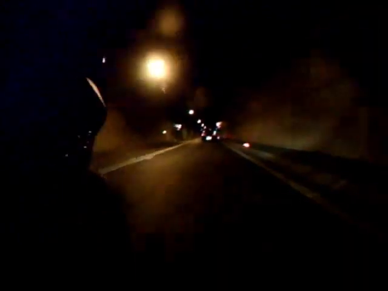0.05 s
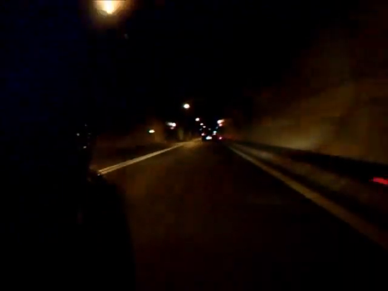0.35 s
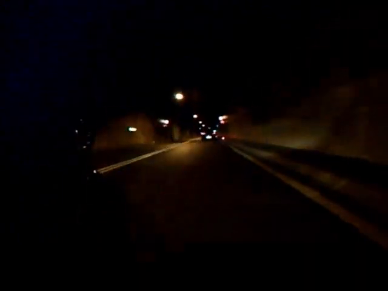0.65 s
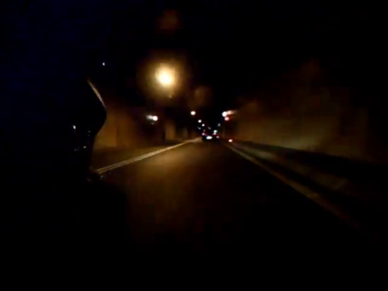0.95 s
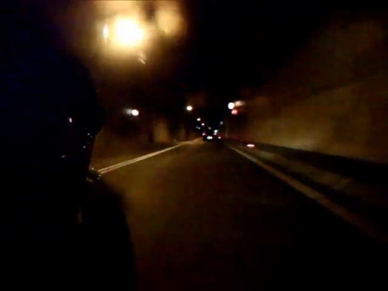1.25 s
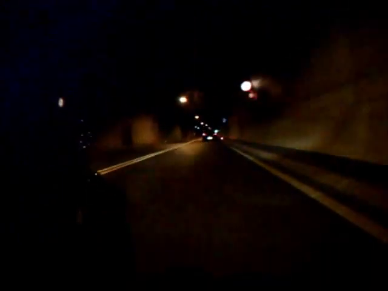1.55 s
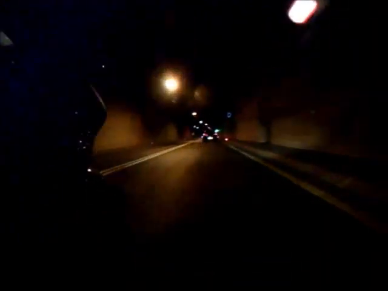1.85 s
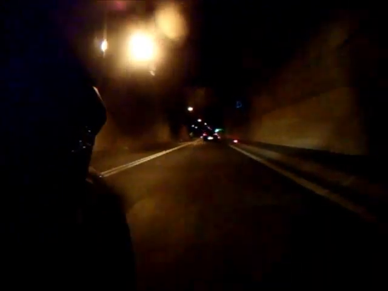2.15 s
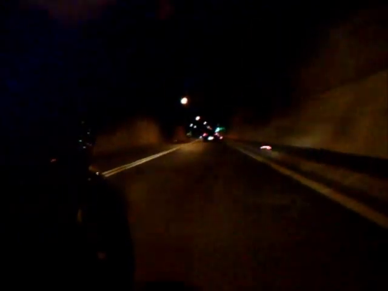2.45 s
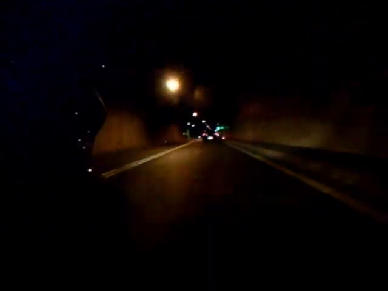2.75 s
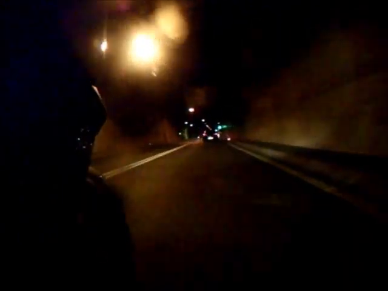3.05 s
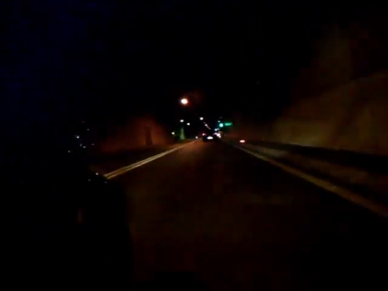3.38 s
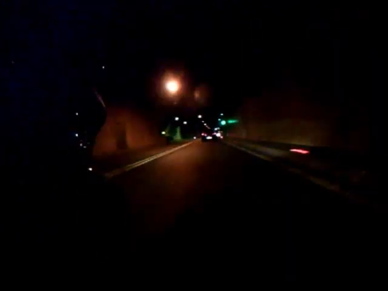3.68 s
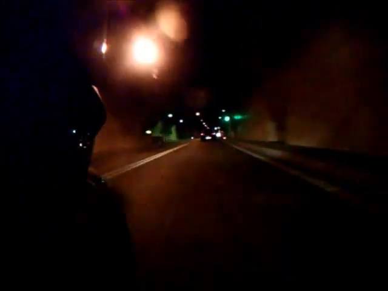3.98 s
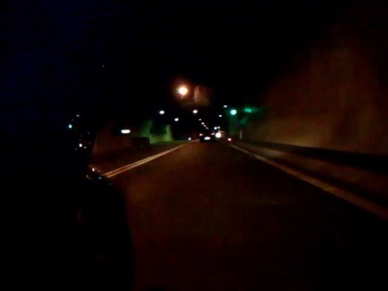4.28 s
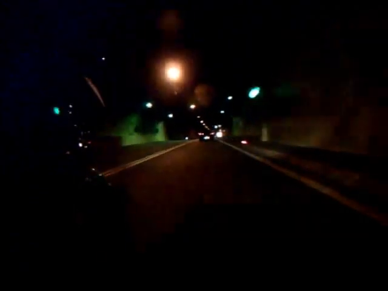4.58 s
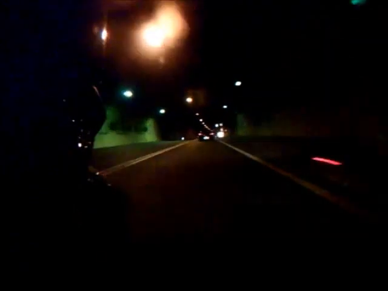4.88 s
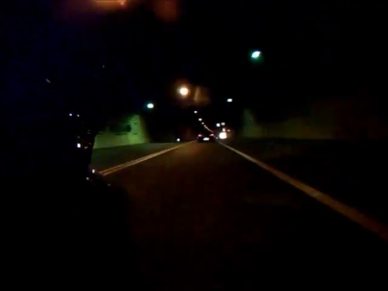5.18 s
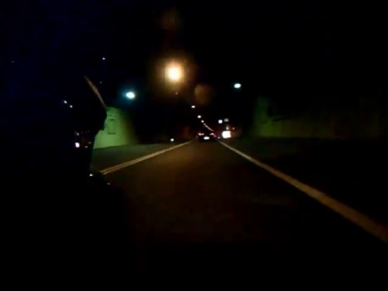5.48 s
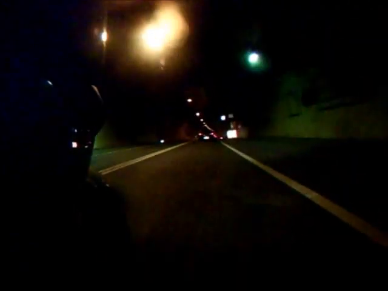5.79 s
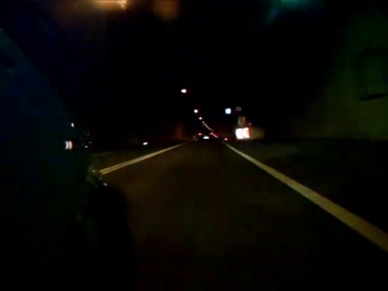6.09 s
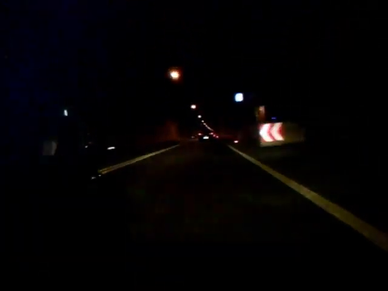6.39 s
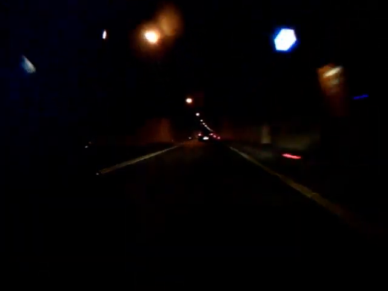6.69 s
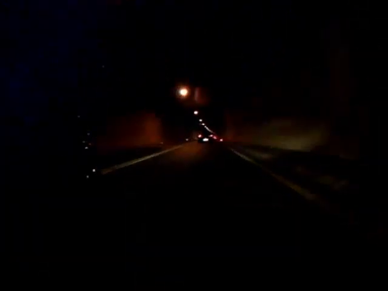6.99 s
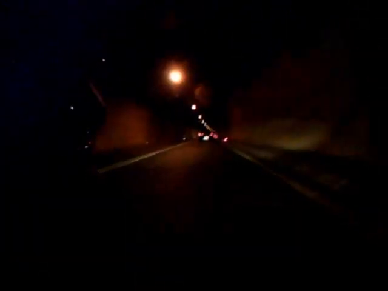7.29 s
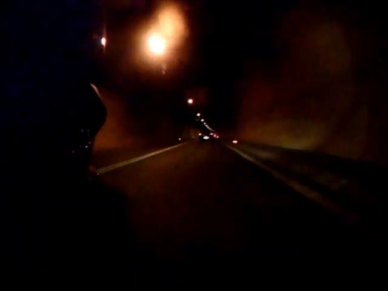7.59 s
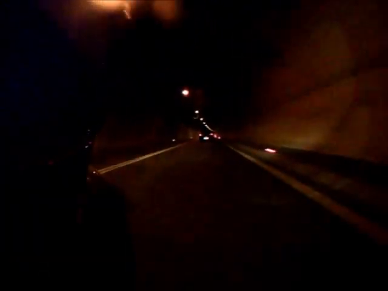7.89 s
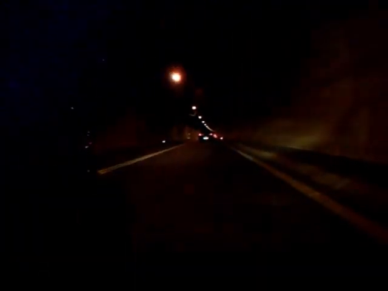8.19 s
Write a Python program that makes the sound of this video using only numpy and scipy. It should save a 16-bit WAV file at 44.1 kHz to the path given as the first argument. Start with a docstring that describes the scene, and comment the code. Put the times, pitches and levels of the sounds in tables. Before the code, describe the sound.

Wind and tyre roar surround the even hum and whine of a motorcycle cruising in a tunnel, with occasional bumps and faint ticks.

```python
"""In a road tunnel, a four-cylinder motorcycle cruises along with a small camera mounted on it.
Wind and tyres roar, bumps set the mount swinging, and another engine rises faintly far off.
Over the roar the exhaust hums, the gears whine and the valves clatter, echoing off the concrete.
The camera passes only a narrow band of pitches and ticks where its blocks of sound join."""
import sys
import numpy as np
from scipy import signal
from scipy.fft import rfft, irfft, next_fast_len
from scipy.io import wavfile
from scipy.ndimage import uniform_filter1d, map_coordinates

SR = 44100
rng = np.random.default_rng(int(sys.argv[2]) if len(sys.argv) > 2 else 0)


def master(y):
    """Save y as 16-bit WAV."""
    cut = np.clip(np.atleast_2d(y).T, -1, 1)
    pcm = np.round(cut * 32767)  # scale
    wavfile.write(sys.argv[1], SR, pcm.astype(np.int16))


N = 367794
T = np.arange(N) / SR


def amp(db):
    """Turn decibels into a gain."""
    return 10 ** (np.asarray(db) / 20)


def unit(x):
    """Scale x to an average (rms) level of 1."""
    return x / np.sqrt(np.mean(x ** 2) + 1e-20)


def along(points, hz):
    """Read between (f/Hz, value) points on a log pitch scale."""
    f, values = np.transpose(points)
    return np.interp(np.log(hz + 1), np.log(f + 1), values)


def curve(points):
    """Join (t/s, value) points with straight lines."""
    return np.interp(T, *np.transpose(points))


def wobble(rate):
    """A smooth random curve through `rate` points a second."""
    coarse = T[::64]
    return np.interp(T, coarse, map_coordinates(rng.standard_normal(400), [coarse * rate], mode="wrap"))


def filtered(x, response):
    """Shape x with a response given for each frequency."""
    size = next_fast_len(N + SR // 2)
    return irfft(rfft(x, size) * response(np.fft.rfftfreq(size, 1 / SR)), size)[:N]


def noise(response):
    """Noise of rms 1, shaped by a response."""
    return unit(filtered(rng.standard_normal(N), response))


def resonance(hz, centre, width):
    """The response of something that rings at one pitch."""
    return 1j * hz * width / (centre ** 2 - hz ** 2 + 1j * hz * width)


def pulses(turns):
    """One pulse, shared between two samples, each time turns passes a whole number."""
    at = np.interp(np.arange(np.ceil(turns[0]), turns[-1]), turns, np.arange(N))
    whole = at.astype(int)
    return (np.bincount(whole, 1 - at + whole, N + 1) + np.bincount(whole + 1, at - whole, N + 1))[:N]


def tone(turns, scatter, rate):
    """A sine plus its drifting reflections from the passing walls, at rms 1."""
    angle = 2 * np.pi * (turns + rng.random())
    return unit((1 + scatter * wobble(rate)) * np.sin(angle) + scatter * wobble(rate) * np.cos(angle))


# The distant engine speeding up: start t/s, end t/s, first f/Hz, last f/Hz, level/dB
FAR_RISE = (4.5, 6, 104, 131, -55.5)

def far_engine():
    """The second and third harmonics of another engine swell, rise and fade far down the tunnel."""
    start, end, first_hz, last_hz, db = FAR_RISE
    progress = np.clip((T - start) / (end - start), 0, 1)
    turns = np.cumsum(first_hz + (last_hz - first_hz) * progress) / SR
    harmonics = sum(tone(k * turns, scatter=0.39, rate=10) for k in (2, 3))
    return amp(db) * np.sin(np.pi * progress) * harmonics


def tunnel_echo(x, fade_s=1.4):
    """The concrete tube answers with a long, blurred echo."""
    t = T[:2 * SR]
    tail = rng.standard_normal(len(t)) * amp(-60 * t / fade_s)
    return signal.fftconvolve(x, tail / np.linalg.norm(tail))[:N]


# The ticks that stand out: t/s, relative level/dB
LOUD_SNAPS = [(0.2538, -25), (0.3207, -25), (0.3875, -23), (0.4544, -27), (0.5212, -29), (0.9547, -30),
              (1.8891, -31), (2.5232, -24), (2.59, -29), (2.7237, -26), (3.024, -27), (3.5244, -31),
              (3.7918, -32), (4.0921, -31), (4.1589, -33), (4.6593, -27), (4.793, -31), (5.2934, -34),
              (5.8606, -29), (6.0611, -34), (6.3614, -27), (7.5627, -28), (7.6296, -27), (8.1973, -28)]

def camera_ticks(gain_db=6.5, first_s=.1873, tick_gap_s=.0668, run_gap_s=.5673, pattern_s=2.7703):
    """One-sample spikes where blocks of sound join, in repeating runs: most are faint, a few snap."""
    times = [first_s + pattern_s * pattern + run_gap_s * run + tick_gap_s * tick
             for pattern in range(3)
             for run, count in enumerate((6, 6, 6, 5, 5))
             for tick in range(count)]
    levels = -39.5 + 9.5 * rng.uniform(-1.3, 1, len(times))
    loud_s = np.transpose(LOUD_SNAPS)[0]
    faint = [(s, db) for s, db in zip(times, levels) if np.abs(loud_s - s).min() > tick_gap_s / 2]
    out = np.zeros(N)
    for s, db in faint + list(LOUD_SNAPS):
        out[round(s * SR)] = amp(db + gain_db) * rng.choice([-1, 1])
    return out


# How strong the road's shaking is at each pitch: f/Hz, relative level/dB
ROAD_SHAKE = [(10, -25.5), (18, -9), (24, 4), (32, 0), (45, -5), (60, -11.5), (78, -9), (98, -21),
              (130, -27.5), (200, -52.5), (400, -116)]

def road_rumble(level_db=-33.0, patchy_db=2.0):
    """Rough asphalt shakes the camera through the frame."""
    shake = noise(lambda f: amp(along(ROAD_SHAKE, f)))
    return amp(level_db + patchy_db * wobble(2.5)) * shake


# Bumps in the road: t/s, jolt level/dB, swing level/dB, swing length/s
ROAD_BUMPS = [(0.223, -14.5, -18.5, 0.55), (0.986, -23, -24.5, .25), (2.527, -15.5, -19.5, 0.26),
              (4.066, -28, -27, 0.12), (4.628, -24, -24, .17), (6.751, -33, -33, 0.7),
              (7.389, -16.5, -19, 0.27)]

def bumps(thud_hz=36.3, thud_s=.022, shudder_s=0.12, mount_hz=24.1):
    """Each bump thuds and makes the frame shudder, then the camera swings on its mount."""
    out = np.zeros(N)
    frame = amp(-17) * noise(lambda f: resonance(f, centre=67.5, width=42) ** 3)
    for s, jolt_db, swing_db, swing_s in ROAD_BUMPS:
        t = T - s
        thud = np.exp(-(t / thud_s) ** 2) * np.cos(2 * np.pi * thud_hz * t)
        shudder = frame * np.exp(-(t / shudder_s) ** 2)
        out += amp(jolt_db) * (thud + shudder)
        swing = np.clip(t / 0.063, 0, 1) * np.exp(-(t / swing_s) ** 4)
        out += amp(swing_db) * swing * np.cos(2 * np.pi * mount_hz * t)
    return out


def rattle(gain_db=-24.0, ring_hz=452, fade_s=.16):
    """The bodywork buzzes briefly after each jolt."""
    shaken = sum(amp(db) * (T > s) * np.exp(-np.abs(T - s) / fade_s) for s, db, _, _ in ROAD_BUMPS)
    return amp(gain_db) * shaken * noise(lambda f: resonance(f, ring_hz, width=70) ** 2)


# Wind and tyre noise between the walls: f/Hz, relative level/dB
ROAR_SHAPE = [(90, -15), (135, 4.5), (180, -8), (240, -7.5), (290, -12.5), (400, -3.5), (650, -5),
              (1150, -0.5), (1290, -18), (1580, -9), (2130, -15), (2550, -7), (3000, -7.5), (3500, -17.5),
              (3900, -8)]
# Pitches that the bodywork boosts or weakens: f/Hz, width/Hz, level change/dB
BODY_RINGS = [(340, 19, 3), (440, 31, 1), (785, 60, 7.5), (850, 25, -3.5), (1438, 76, 8), (1685, 45, 6.5),
              (1820, 49, 11), (1985, 97, 13), (2324, 286, 10.5), (3385, 247, 12.5)]

def roar(cycle, level_db=-32.5, throb=0.099):
    """Wind, tyres and intake rush through the bodywork, throbbing a little with the crank."""
    def colour(f):
        body_db = sum(db / (1 + (2 * (f - hz) / width) ** 2) for hz, width, db in BODY_RINGS)
        return amp(along(ROAR_SHAPE, f) + body_db)

    air = rng.standard_normal(N) * (1 + throb * np.cos(4 * np.pi * cycle))
    return amp(level_db + 0.57 * wobble(2.25)) * unit(filtered(air, colour))


# Knocks in each engine cycle: place in the cycle (0-1), f/Hz, base width/Hz, relative level/dB
CYCLE_KNOCKS = [(.75, 456, 150, -48), (.52, 347, 47, -51.5), (.8, 729, 207, -49), (.05, 1100, 240, -51.5),
                (0.2, 1806, 350, -51), (0.46, 1940, 250, -48.5), (0.43, 2394, 220, -49),
                (.93, 2435, 220, -46), (0.68, 3330, 330, -53), (0.46, 3400, 180, -52.5)]

def clatter(cycle, rasp_db=8.0, fade_cycles=0.12, uneven_db=2.5, widen=1.38):
    """Valves and pistons knock in every cycle: a sharp blow and a short rasp ring the casing."""
    out = np.zeros(N)
    for place, hz, width, db in CYCLE_KNOCKS:
        blow = unit(pulses(cycle - place)) * amp(uneven_db * wobble(35))
        since_knock = (cycle - place) % 1
        rasp = amp(rasp_db) * unit(rng.standard_normal(N) * np.exp(-since_knock / fade_cycles))
        casing = filtered(blow + rasp, lambda f: resonance(f, hz, widen * width) ** 2)
        out += amp(db) * unit(casing)
    return out


# The hum of the cylinders firing: t/s, relative level/dB
FIRING_HUM = [(0.1, -44.5), (0.28, -44.5), (1.82, -46.5), (2.12, -41.5), (6.48, -47), (6.59, -50.5),
              (7.34, -45.5), (8.25, -43)]
# The exhaust's singing note, before its swings are widened: t/s, relative level/dB
EXHAUST_NOTE = [(0.1, -47), (3.07, -54), (3.69, -51.5), (3.71, -44.5), (4.18, -49.5), (4.3, -46.5),
                (7.61, -49), (8.25, -56)]

def exhaust(cycle, singing_db=-50.0, widen=1.7):
    """Four firings a cycle make a hum, and the exhaust sings at five times that pitch."""
    firings = 4 * cycle
    hum = amp(curve(FIRING_HUM) - 0.5) * tone(firings, scatter=.05, rate=7.9)
    note_db = curve(EXHAUST_NOTE)
    swing_db = widen * (note_db - note_db.mean())
    return hum + amp(singing_db + swing_db) * tone(5 * firings, scatter=0.12, rate=8)


def throttle(speed, smooth_s=0.528, hard_pull=.3):
    """How hard the engine pulls, from -1 (slowing) to 1 (gaining speed)."""
    acceleration = uniform_filter1d(np.gradient(speed) * SR, int(smooth_s * SR))
    return np.tanh(acceleration / hard_pull)


# Crank, exhaust drone and three gear whines: multiple of the cycle rate (gets rounded), level/dB,
# change at full pull/dB, change per extra cycle a second/dB, wall scatter (0-1), flutter rate/Hz
MAIN_TONES = [(2, -39, 0, 5.5, .19, 9.7), (12, -45, -0.3, 1.5, 0.07, 14), (46, -60, -1, 14, .2, 6.6),
              (48, -50, 4, -1.5, 0.2, 8), (90.4, -61, -9, 3.5, 0.3, 10)]
# Weaker engine harmonics: multiple of the cycle rate, level/dB
WEAK_TONES = [(3, -53), (7, -60.5), (8, -60.5), (9, -56), (10, -70.5), (11, -59.5), (13, -56.5),
              (14, -59.5), (16, -60.5), (24, -54.5), (28, -63.5), (32, -58), (52, -59.5), (61, -50.5),
              (63, -54.5), (86, -64), (89, -67.5)]
# Gearbox and chain tones between the harmonics: multiple of the cycle rate, level/dB
CHAIN_TONES = [(9.25, -57.5), (11.8, -59.5), (18.51, -58.5), (19.35, -54), (30.78, -55.5)]

def engine_tones(cycle, speed, drift_db=1.0):
    """Crank, gears and chain turn with the engine; the main whine grows under load, the top one fades."""
    pull = throttle(speed)
    extra_speed = speed - speed.mean()
    out = np.zeros(N)
    for multiple, db, pull_db, speed_db, scatter, rate in MAIN_TONES:
        level_db = db + pull_db * pull + speed_db * extra_speed + drift_db * wobble(3.07)
        out += amp(level_db) * tone(np.round(multiple) * cycle, scatter, rate)
    for multiple, db in WEAK_TONES:
        out += amp(db) * tone(multiple * cycle, scatter=0.41, rate=5)
    for multiple, db in CHAIN_TONES:
        out += amp(db) * tone(multiple * cycle, scatter=.35, rate=6)
    return out


# Engine speed, where one cycle is two turns of the crank: t/s, cycle rate f/Hz
ENGINE_SPEED = [(0.0, 38.2), (0.16, 38.0), (1.69, 37.7), (2.9, 38.3), (4.02, 38.5), (7.46, 37.8),
                (7.99, 37.9), (8.34, 38.2)]

def scene():
    """The motorcycle, the echo of its clatter, the road and a distant engine."""
    speed = curve(ENGINE_SPEED)
    cycle = np.cumsum(speed) / SR  # engine cycles so far
    knocks = clatter(cycle)
    tones = exhaust(cycle) + engine_tones(cycle, speed)
    engine = tones + amp(-4.5) * knocks + amp(-6) * tunnel_echo(knocks)
    return (engine + roar(cycle) + road_rumble() + bumps() + rattle() + far_engine())[None]


def record(dry):
    """The camera cuts the treble like a telephone; its own ticks reach far higher."""
    cutoff_hz, slope_hz, tick_top_hz = 4150, 520, 16000
    narrow = filtered(dry[0], lambda f: np.clip((cutoff_hz - f) / slope_hz, 0, 1) ** 2)
    return filtered(narrow + camera_ticks(), lambda f: 1 / (1 + (f / tick_top_hz) ** 120))[None]


dry = scene()
out = record(dry)
master(out)
```